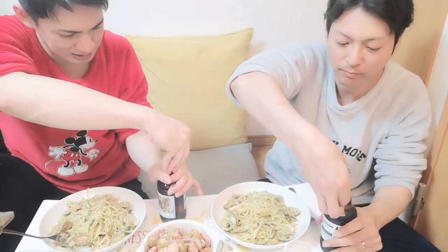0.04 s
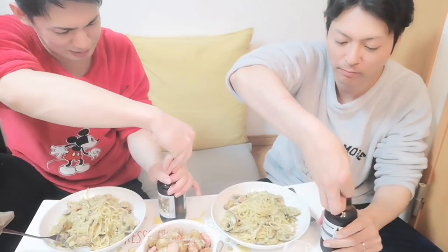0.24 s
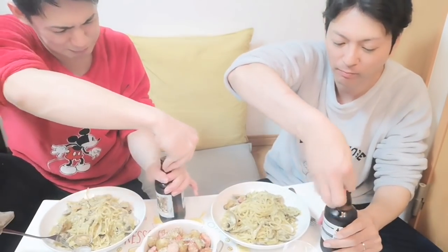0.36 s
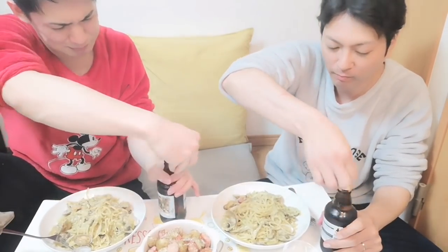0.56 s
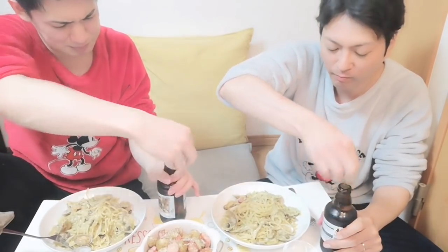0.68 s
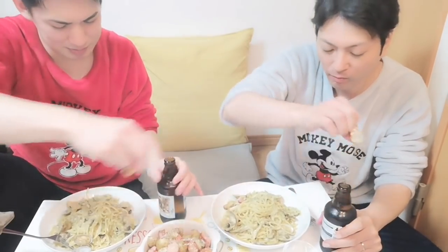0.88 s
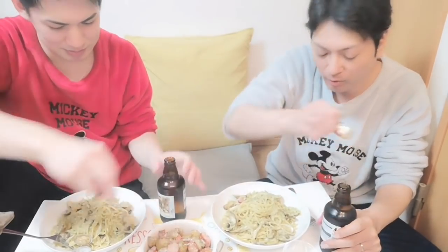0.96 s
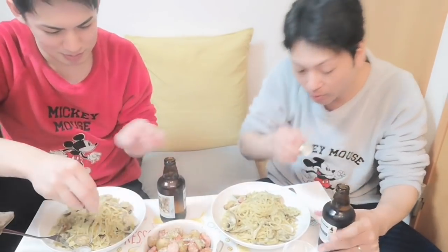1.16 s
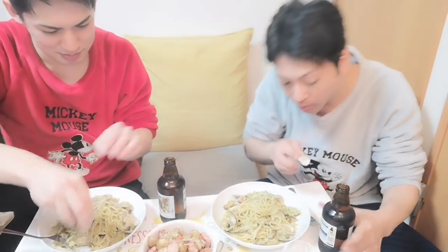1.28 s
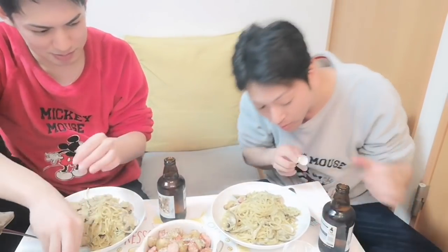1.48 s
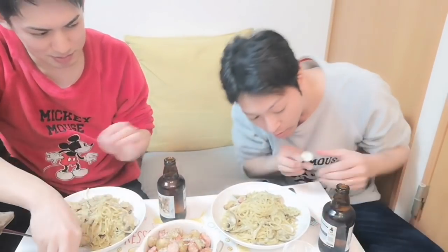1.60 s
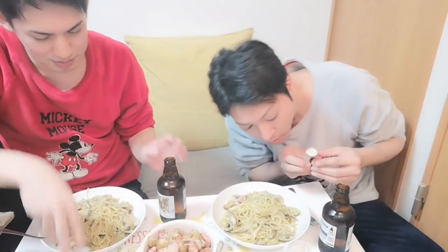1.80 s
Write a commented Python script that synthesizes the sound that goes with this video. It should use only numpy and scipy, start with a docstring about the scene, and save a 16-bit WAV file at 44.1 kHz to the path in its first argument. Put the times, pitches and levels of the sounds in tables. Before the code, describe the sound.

Glass beer bottles being opened at a dining table. Faint knocks at the start, a short sputtering gas hiss at 0.19 s, then a sharp metal crack and loud hollow pop at 0.41 s with a low thump. A second, quieter crack and pop with a thump comes at 0.75 s. Faint cap ticks around 1.1-1.2 s, a tiny jingle at 1.54 s, two tableware clinks near 1.8 s, over quiet small-room hum.

```python
"""Gas hisses from under a cap, then two glass beer bottles open at a dining table in a small room:
each cap gives a metal crack, a hollow pop of the bottle neck and a low thump of the table.
Caps tick in the fingers, things knock softly, a cap jingles and tableware clinks twice over room tone.
Cracks, knocks and ticks are coloured bursts of noise; the hiss is shaped noise; neck, table, cap and
tableware ring as fading sine waves. The room adds a wall reflection, early scatter and a tail."""
import sys
import numpy as np
from scipy import signal
from scipy.fft import rfft, irfft, next_fast_len
from scipy.io import wavfile
from scipy.ndimage import map_coordinates

SR = 44100
rng = np.random.default_rng(int(sys.argv[2]) if len(sys.argv) > 2 else 0)


def wav_out(sig):
    """Save sig, one row per channel (or a flat mono array), as 16-bit PCM at SR to the path in sys.argv[1]."""
    wavfile.write(sys.argv[1], SR, np.round(np.clip(np.atleast_2d(sig).T, -1, 1) * 32767).astype(np.int16))


N = 81585  # length of the scene in samples
T = np.arange(SR * 3 // 4) / SR  # time line of one sound [s]
# "t60" below is the time in which a sound fades by 60 dB.


def amp(db):
    """Turn decibels into a gain."""
    return 10 ** (np.asarray(db) / 20)


def along(points, hz):
    """Read a curve of (frequency, value) points on a logarithmic frequency axis."""
    point_hz, values = np.transpose(points)
    return np.interp(np.log(hz + 1e-6), np.log(point_hz), values)


def fade(t60, t=T):
    """Exponential decay by 60 dB in t60 seconds."""
    return amp(-60 * t / t60)


def flutter(hz):
    """A smooth random curve through hz random knots a second."""
    return map_coordinates(rng.standard_normal(1024), [T * hz])


def colour(x, points, scale=1, keep_power=True):
    """Filter through (frequency, dB) points, reacting only after the sound arrives (minimum phase)."""
    m = 2 * next_fast_len(x.shape[-1])
    gain = amp(along(points, np.fft.rfftfreq(m, 1 / SR) / scale))
    if keep_power:
        gain = gain / np.sqrt(np.mean(gain ** 2))
    # Folding the cepstrum onto positive times gives the filter its phase.
    cepstrum = irfft(np.log(gain))
    cepstrum[1:m // 2] *= 2
    cepstrum[m // 2 + 1:] = 0
    response = np.exp(rfft(cepstrum))
    return irfft(rfft(x, m) * response, m)[..., :x.shape[-1]]


def diffuse(size):
    """Stereo white noise, alike in the bass and mostly unrelated in the treble."""
    # how alike left and right are: (frequency [Hz], correlation [0 to 1])
    likeness = [(60, 1), (200, 0.9), (400, 0.34), (1000, 0), (2500, 0.12), (15000, 0)]
    alike = np.clip(along(likeness, np.fft.rfftfreq(size, 1 / SR)), -1, 1)
    turn = np.arccos(alike) / 2
    spectra = rfft(rng.standard_normal((2, size)))
    mid, side = irfft(spectra * [np.cos(turn), np.sin(turn)], size)
    return np.array([mid + side, mid - side])


def burst(points, t60, scale=1):
    """A dying crackle of noise with an evened spectrum, given the colour of a struck body."""
    spectrum = rfft(rng.standard_normal(len(T)) * fade(t60))
    even = irfft(spectrum / (np.abs(spectrum) + 1e-9), len(T))
    even = even * fade(6 * t60)
    return colour(even * np.linalg.norm(fade(t60)), points, scale)


def ring(modes, rise):
    """A body rings as a sum of sine waves, each with its own pitch, level and decay."""
    tones = sum(amp(db) * np.sin(2 * np.pi * hz * T) * fade(t60) for hz, db, t60 in modes)
    return tones * (1 - np.exp(-T / rise))


def in_room(x, pan_db=0, wet_db=0):
    """Direct sound, one wall reflection, early scatter and a tail whose decay depends on pitch."""
    # how long the tail lasts: (frequency [Hz], t60 [s])
    tail_decay = [(100, 0.36), (400, 0.21), (1100, .27), (4000, 0.28), (7500, 0.28), (14000, 0.3)]
    tail_db, early_db, early_t60_s = 3, 1.5, 0.079
    wall_s, wall_db = .0078, -4
    ear_lag_s = .0001  # the direct sound reaches the left ear this much later

    hz, t, noise = signal.stft(diffuse(len(T)), SR, nperseg=256)
    decay = fade(along(tail_decay, hz)[:, None], t)
    tail = signal.istft(noise * decay, SR, nperseg=256)[1][:, :len(T)]
    early = diffuse(len(T)) * fade(early_t60_s)
    tail = amp(tail_db) * tail / np.linalg.norm(tail[0])
    early = amp(early_db) * early / np.linalg.norm(early[0])
    build = amp(wet_db) * (1 - np.exp(-T / .003))  # scatter and tail swell in over about 3 ms
    answer = build * (tail + early)
    for ear in (0, 1):
        answer[ear, round((1 - ear) * ear_lag_s * SR)] += 1
        answer[ear, round((wall_s + rng.normal(0, .0001)) * SR)] += amp(wall_db)
    heard = signal.fftconvolve(x[None], answer, axes=1)[:, :len(T)]
    return heard * amp([[pan_db / 2], [-pan_db / 2]])  # pan_db: left over right


def snap(db, pan_db):
    """The bright, nearly dry instant at which metal touches or lets go."""
    # colour of hard metal contact: (frequency [Hz], relative level [dB])
    contact = [(1500, -17), (3500, 1.5), (6000, 10.5), (8000, 0.5), (11000, 1.5), (15000, 7)]
    extra_db, t60_s, room_db = 0.5, .007, -19
    return in_room(amp(db + extra_db) * burst(contact, t60_s), pan_db, room_db)


def add(out, s, x):
    """Mix a sound in at its time."""
    i = max(0, round(s * SR))
    out[:, i:i + len(T)] += x[..., :N - i]


def room_tone():
    """Quiet air, made of coloured noise, with a steady low hum."""
    # colour of the air noise: (frequency [Hz], relative level [dB])
    air = [(25, -17.5), (60, -11.5), (95, -6), (130, -10), (172, -6.5), (215, -21.5), (326, -18),
           (500, -27.5), (1000, -26.5), (1900, -22), (3200, -27.5), (5000, -33), (8000, -33), (9800, -18),
           (11000, -27.5), (15000, -36.5)]
    air_db, hum_hz, hum_db = -66.5, 93.8, -72
    hum = np.sqrt(2) * np.sin(2 * np.pi * hum_hz * np.arange(N) / SR)
    return amp(air_db) * colour(diffuse(N), air) + amp(hum_db) * hum


def table():
    """Knocks are short noise; bumps ring the table and room; slow heaves are single low tones."""
    # soft knocks on the table: (time [s], level [dB], pitch [Hz], t60 [s])
    knocks = [(.001, -52.5, 946, 0.12), (.002, -47.5, 162, 0.083), (0.541, -42.5, 424, 0.077)]
    # colour of a knock: (multiple of the pitch, relative level [dB])
    knock_shape = [(.1, -10.5), (.6, -7.5), (1, -4), (1.4, -13), (3, -19), (10, -44)]
    # bumps of a bottle on the table: (time [s], level [dB])
    bumps = [(0.196, -38), (0.253, -48), (0.409, -29.5), (0.58, -39), (0.7511, -26), (0.811, -39.5)]
    # low ring of table and room: (frequency [Hz], relative level [dB], t60 [s])
    boom = [(93.6, -3.5, .16), (128, 3, 0.064), (160, -2.5, 0.095), (169.44, -6, .08)]
    # slow heaves of the table: (time [s], level [dB], frequency [Hz], t60 [s])
    heaves = [(.425, -32, 42.1, .22), (0.567, -30, 48, 0.096)]
    for s, db, hz, t60 in knocks:
        yield s, in_room(amp(db) * burst(knock_shape, t60, hz))
    for s, db in bumps:
        yield s, in_room(amp(db) * ring(boom, rise=0.0055), wet_db=-2.5)
    for s, db, hz, t60 in heaves:
        yield s, amp(db) * ring([(hz, 0, t60)], rise=.02)  # no room added


def handling():
    """Caps tick as short noise; a jingling cap and clinking tableware mix noise with ringing tones."""
    # caps ticking in the fingers: (time [s], level [dB], pitch [Hz], left over right [dB],
    # snap over the tick [dB], before the extra that snap() adds)
    ticks = [(.156, -45.5, 6300, -4.5, -20), (0.382, -56, 6060, -15, 1), (.622, -50.5, 6120, -7, -21),
             (0.696, -49, 5700, -6.5, 14), (1.076, -55.5, 5390, -8, -9.5), (1.192, -55.5, 1910, -6, -18),
             (1.212, -58, 4430, -7, -17), (1.237, -62, 1950, 3, -25)]
    # colour of a tick: (multiple of the pitch, relative level [dB])
    tick_shape = [(.1, -17), (.55, -13.5), (.8, -0.5), (1, 5), (1.3, 2.5), (2.2, -14.5)]
    # a loose cap jingles: (time [s], level [dB])
    jingles = [(1.5355, -61)]
    # ringing of the cap: (frequency [Hz], relative level [dB], t60 [s])
    cap_modes = [(5010, -7, 0.032), (5860, 6, .035), (7100, 11, .035), (7050, 10, 0.045),
                 (7000, -7.5, .035), (7900, -14, .035)]
    # colour of the scraping cap: (frequency [Hz], relative level [dB])
    cap_scrape = [(4400, -49), (5100, 5), (6900, 3.5), (7900, 0.5), (9000, -15)]
    # tableware set down: (time [s], level [dB], left over right [dB])
    clinks = [(1.7724, -34, -5.5), (1.8295, -39, 2)]
    # colour of a clink's noise: (frequency [Hz], relative level [dB])
    ware = [(150, -4), (550, -14.5), (820, -4), (1500, -1.5), (2400, -8.5), (2900, 2), (3600, 10),
            (4200, -2.5), (4800, 8), (5800, 2.5), (6900, 5), (8000, 2), (14000, -25)]
    # ringing of the tableware: (frequency [Hz], relative level [dB], t60 [s])
    ware_modes = [(782, -6.5, 0.031), (1144, -7, 0.077), (1470, -8, 0.1), (2116, -7.5, 0.089),
                  (2840, -1, .05), (2990, -6, 0.027), (3800, 10, 0.021), (5070, -25, .12),
                  (5340, 12, 0.017), (7040, 10, 0.02)]
    tick_t60_s, clink_t60_s = 0.016, 0.026
    scrape_db, ware_ring_db = 15.5, -14.5  # gain of the scrape; gain of the tableware's ring

    for s, db, hz, pan_db, snap_db in ticks:
        tick = amp(db) * burst(tick_shape, tick_t60_s, hz)
        yield s, in_room(tick, pan_db) + snap(db + snap_db, pan_db)
    for s, db in jingles:
        scrape = amp(scrape_db) * burst(cap_scrape, tick_t60_s)
        yield s, in_room(amp(db) * (ring(cap_modes, rise=0.00026) + scrape))
    for s, db, pan_db in clinks:
        clink = burst(ware, clink_t60_s) + amp(ware_ring_db) * ring(ware_modes, rise=0.00019)
        yield s, in_room(amp(db) * clink, pan_db, wet_db=-2.5) + snap(db - 16, pan_db)


def gas():
    """The seal opens and gas rushes through the gap as noise, swelling, sputtering and fading."""
    # gas escaping: (time [s], level [dB], rise [s], t60 [s])
    hisses = [(.188, -27.5, 0.014, 0.078), (0.261, -41.5, 0.00586, 0.045)]
    # colour of the hiss: (frequency [Hz], relative level [dB])
    hiss_colour = [(100, -4.5), (300, -12), (700, -13), (1200, -8), (2100, -0.5), (3200, -7), (4700, -0.5),
                   (5300, 0), (6000, -1.5), (7400, 11.5), (8200, 5.5), (14000, -0.5)]
    sputter_db, sputter_hz = 1.5, 378  # depth, and random knots a second
    for s, db, rise, t60 in hisses:
        sputter = amp(sputter_db * flutter(sputter_hz))
        opening = np.minimum(.4 + T / rise, 1)  # the gap starts part open
        flow = opening * sputter * fade(t60, np.maximum(T - rise, 0))
        hiss = colour(flow * rng.standard_normal(len(T)), hiss_colour)
        yield s, in_room(amp(db) * hiss, pan_db=-4)


def pops():
    """The cap cracks free, a puff leaves the neck and the air in the neck rings upward in pitch."""
    # caps coming off: (time [s], crack level [dB], neck level [dB], final neck pitch [Hz],
    # how far below it the pitch starts [Hz], neck t60 [s], puff level [dB])
    openings = [(0.4087, -15, 2.5, 1177, 150, .026, -19.5), (0.7479, -21, -15.5, 1205, 40.2, 0.031, -31)]
    # colour of each cap's crack, one list a cap: (frequency [Hz], relative level [dB])
    caps = [
        [(1000, 1), (1500, -11.5), (1800, -3), (3000, -4), (3600, 5.5), (4200, 0.5), (6500, -0.5), (7500, 3.5),
         (7900, 9.5), (9000, -12), (14000, -12)],
        [(1000, -8.5), (1500, -6.5), (1900, 0), (3100, -8.5), (3700, 5), (4300, 3.5), (4900, -3), (5900, -6.5),
         (6700, 4), (7600, -2.5), (9000, -7.5), (14000, -15)],
    ]
    # colour of the puff: (frequency [Hz], relative level [dB])
    puff_colour = [(30, -12.5), (90, -3), (300, 1), (450, -6), (800, -2.5), (1220, 5.5), (1380, -19.5),
                   (3000, -49.5)]
    crack_t60_s, puff_t60_s = .028, .045
    scoop_s, neck_rise_s = .004, .007  # time constants of the pitch rise and of the swell
    rough_rad, rough_hz = .25, 300  # turbulence in the neck: phase flutter and its knots a second

    for (s, crack_db, neck_db, hz, scoop, t60, puff_db), cap in zip(openings, caps):
        crack = amp(crack_db) * burst(cap, crack_t60_s)
        yield s, in_room(crack, pan_db=-4.0) + snap(crack_db, pan_db=-7.5)
        phase = 2 * np.pi * np.cumsum(hz - scoop * np.exp(-T / scoop_s)) / SR
        tone = np.sin(phase + rough_rad * flutter(rough_hz))
        neck = amp(neck_db) * tone * fade(t60) * (1 - np.exp(-T / neck_rise_s))
        puff = amp(puff_db) * burst(puff_colour, puff_t60_s)
        yield s, in_room(neck + puff, pan_db=-.5, wet_db=-2.5)


def scene():
    """All the sounds at the table over the room tone."""
    out = room_tone()
    for source in (table, handling, gas, pops):
        for s, sound in source():
            add(out, s, sound)
    return out


def record(dry):
    """The overall colour: duller above 8 kHz, a dip near 10 kHz, nothing above 15.9 kHz."""
    # overall colour of the sound: (frequency [Hz], gain [dB])
    overall = [(20, 2.5), (6000, 0), (7000, 0.5), (7950, 0), (8500, -13.5), (9800, -23), (10800, -12.5),
               (14500, -10), (15800, -24.5)]
    top_hz = 15900
    m = next_fast_len(N + SR // 2)
    heard = colour(dry, overall, keep_power=False)
    in_band = np.fft.rfftfreq(m, 1 / SR) < top_hz
    return irfft(rfft(heard, m) * in_band, m)[:, :N]


dry = scene()
out = record(dry)
wav_out(out)
```